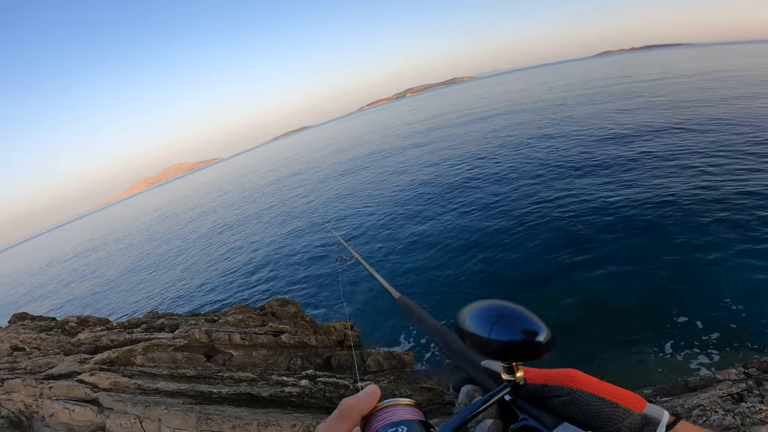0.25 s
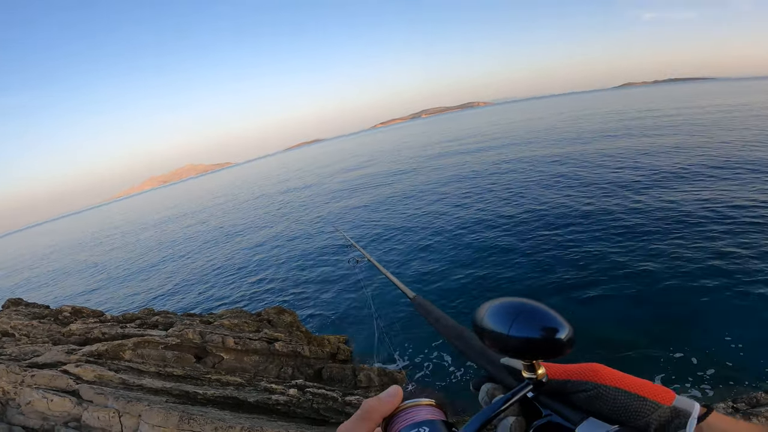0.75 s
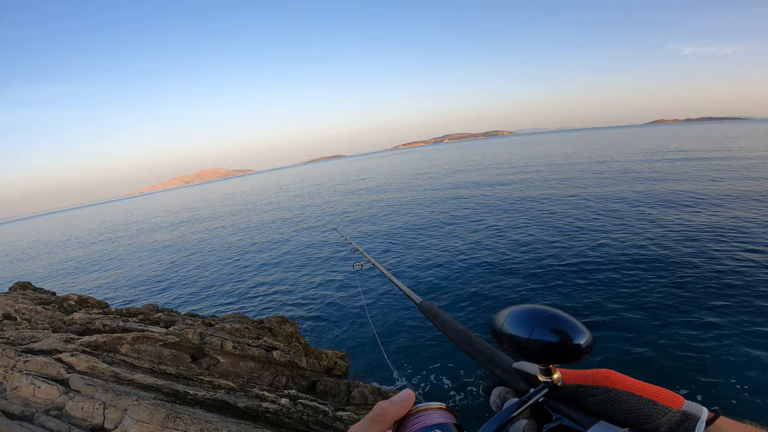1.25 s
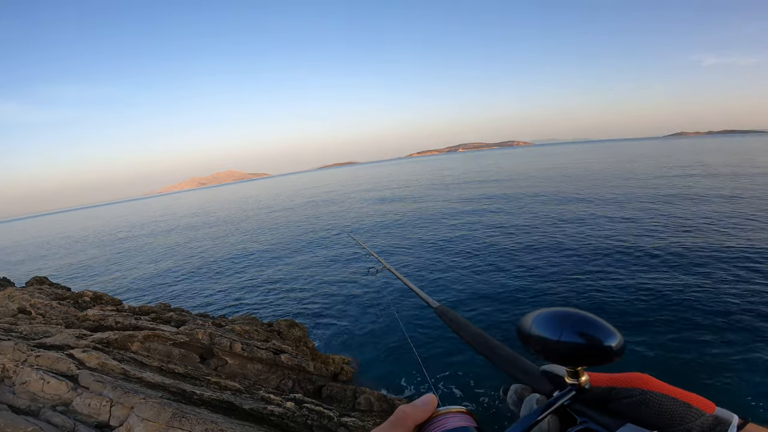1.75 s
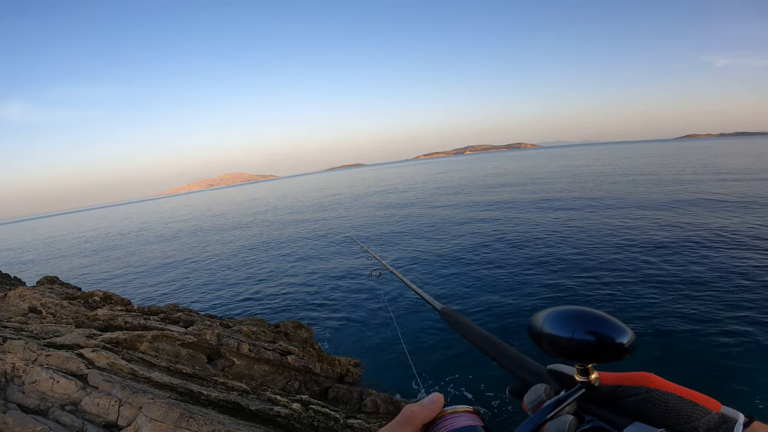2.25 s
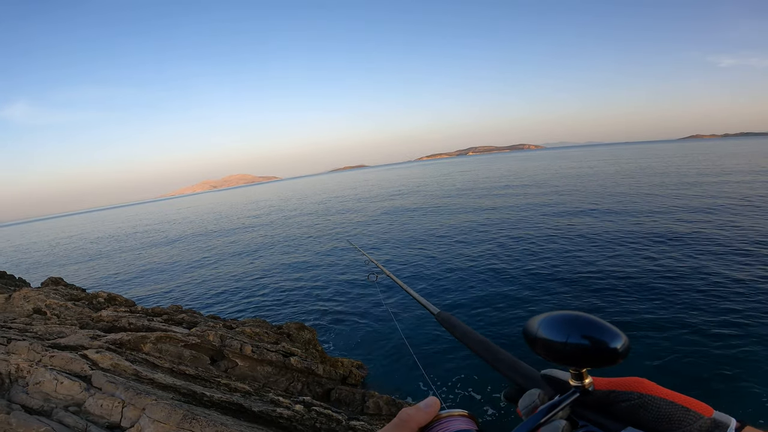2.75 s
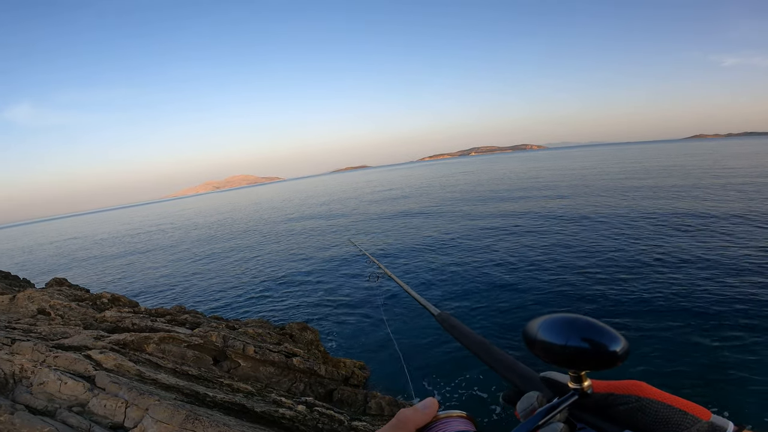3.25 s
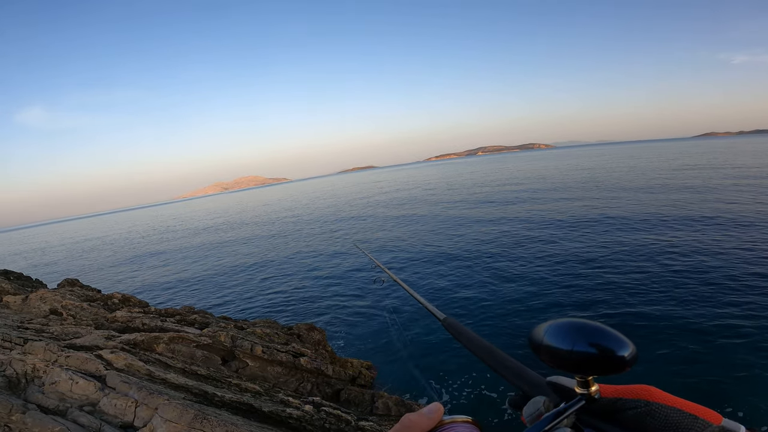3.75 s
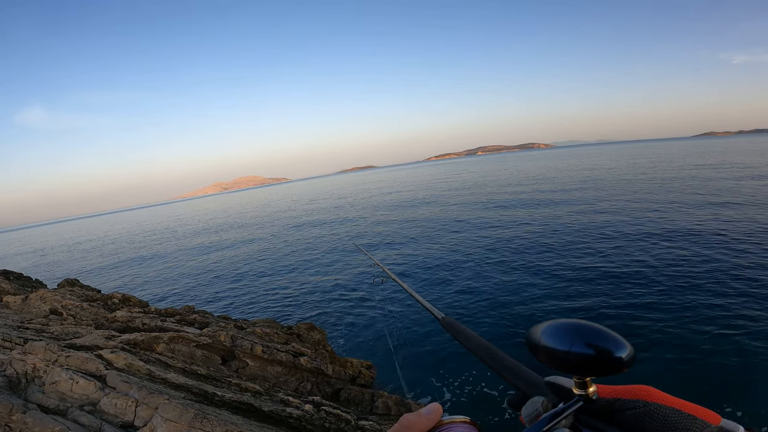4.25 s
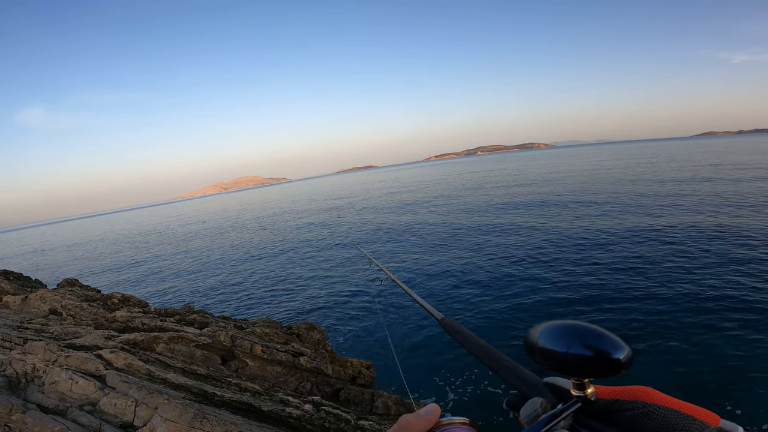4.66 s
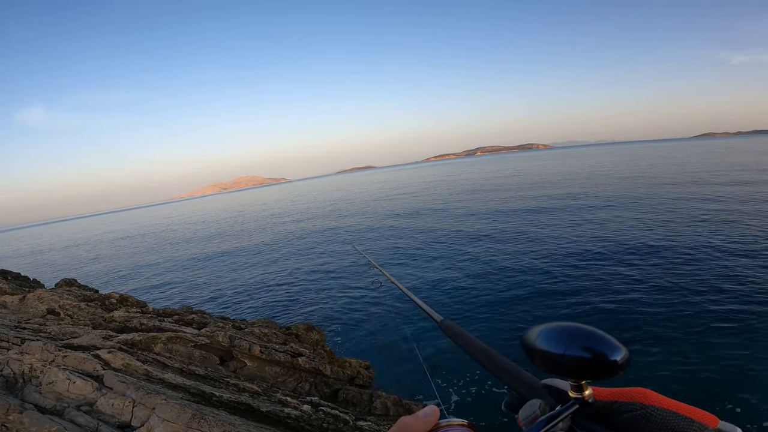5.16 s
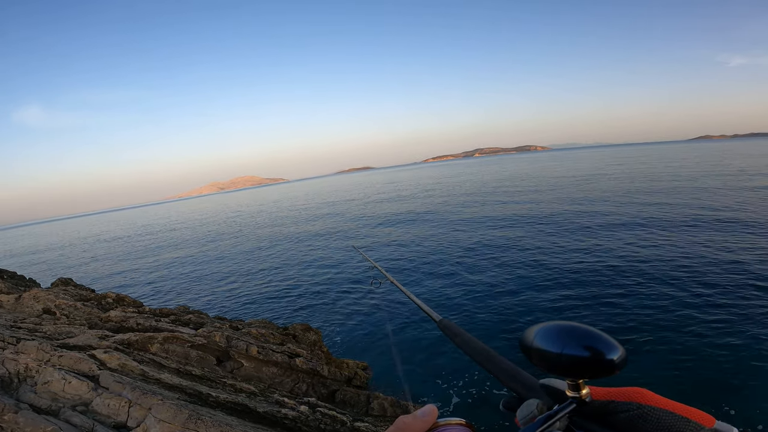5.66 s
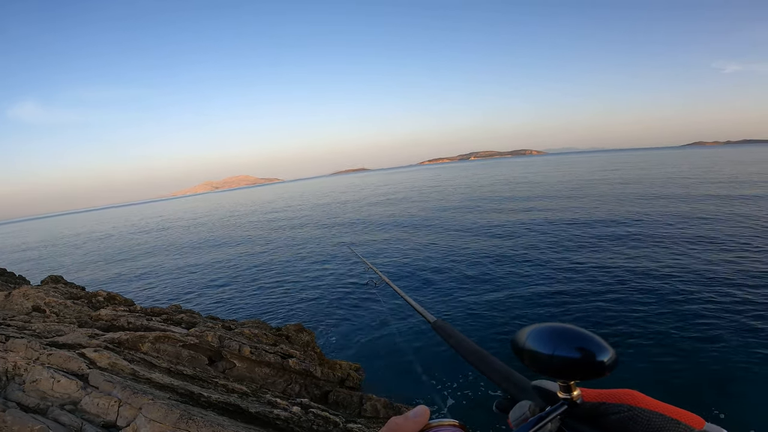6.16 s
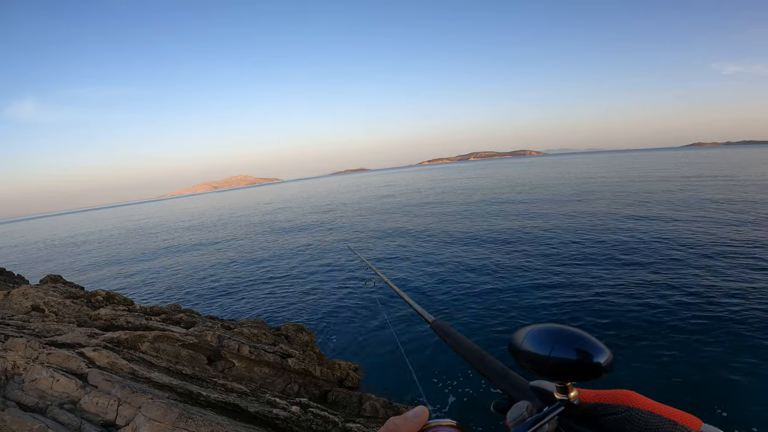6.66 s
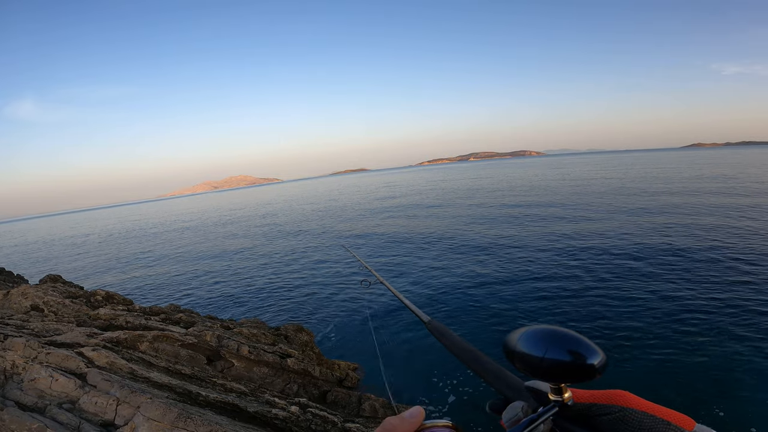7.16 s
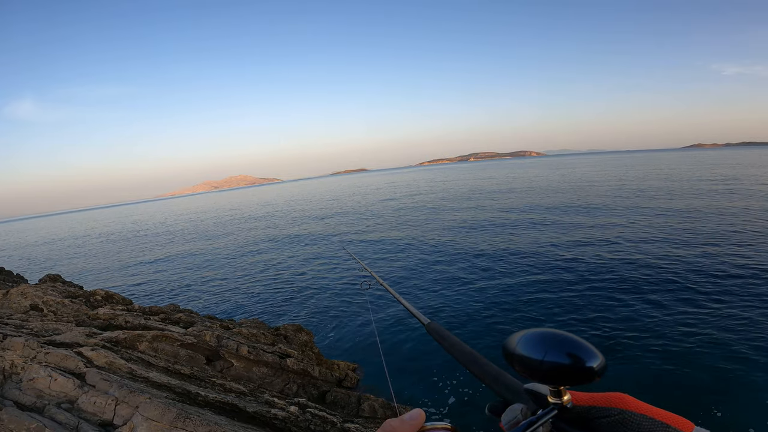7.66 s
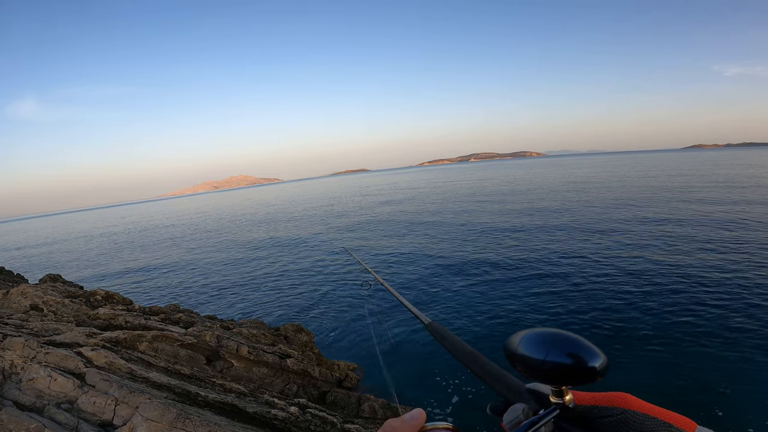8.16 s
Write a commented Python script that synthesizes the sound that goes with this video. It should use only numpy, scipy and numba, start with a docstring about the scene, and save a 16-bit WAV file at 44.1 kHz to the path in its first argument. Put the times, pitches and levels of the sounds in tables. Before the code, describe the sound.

Close seawater slaps, glugs and fizzes on rock above a steady deep engine hum that slowly swells; loose gear clatters right at the end.

```python
"""Small waves lap and gurgle among shore rocks from the start, over a far ship's drone and a low rumble.
Trapped air rings as pitched bubbles and spray ticks on stone; thin foam hisses near 1 s and from 3 to 4 s.
A hollow in the rock fills with a glug at 5.6 s, and the drone, made of sine waves, swells until 7.5 s.
Just after 8 s loose fishing tackle rattles briefly: ringing knocks with bright scrapes of noise."""
import sys
import numpy as np
from scipy import signal
from scipy.fft import rfft, irfft
from scipy.io import wavfile
from scipy.ndimage import uniform_filter1d
from numba import njit

SR = 44100
rng = np.random.default_rng(int(sys.argv[2]) if len(sys.argv) > 2 else 0)


def pcm_store(signal):
    """Save signal as 16-bit PCM."""
    levels = np.round(np.clip(np.atleast_2d(signal), -1, 1) * 32767)
    wavfile.write(sys.argv[1], SR, levels.astype(np.int16).T)


N = 371322

# The waves. Each row: crest in seconds, seconds to rise the last 10 dB, seconds to fall the first 10 dB,
# then relative levels in dB of the gulps, lapping, fizz and spray.
WAVES = [(0.05, 1, 0.14, -54, -57, -61.5, -71), (.3, 0.5, 0.5, -54.5, -57.5, -68, -84),
         (.8, 0.5, 0.35, -50, -55, -58.5, -68.5), (1.12, 0.2, .2, -51, -59, -59, -69),
         (1.56, .1, .15, -58, -60, -61, -72), (1.34, .07, .1, -55, -56, -58.5, -69.5),
         (1.75, 0.96, .5, -54.5, -55.5, -62, -76), (2.33, 0.4, 0.25, -54, -54.5, -66, -83),
         (2.85, 0.4349, .15, -54, -56.5, -57.5, -73), (3.25, 0.4975, 0.52, -52, -50.5, -51, -67.5),
         (3.59, 0.03, 0.06, -52, -54, -51.5, -70), (3.96, 0, 0.08, -55.5, -53.5, -60, -74.5),
         (3.7, 0.4648, 1, -47.5, -49, -54, -70.5), (4.8, 0, 0.34, -55.5, -56.5, -66, -83),
         (5.05, 0.3, 0.05, -56.5, -55.5, -65.5, -78), (5.62, 0.4044, 0.3, -52.5, -51.5, -58.5, -76),
         (5.87, 0.2, 0.24, -55, -55, -61, -79), (6.07, 0.24, .06, -54.5, -54.5, -64, -76.5),
         (6.6, 0.5, 0.6, -56.5, -67, -67.5, -77), (6.87, 0.1, .15, -59.5, -60.5, -68, -80.5),
         (7.5, 0.19, 0.25, -58, -56, -61, -79), (7.86, 0.2, 0.2, -64, -58.5, -70.5, -75)]
# The water between waves: relative levels in dB of the gulps, lapping, fizz and spray.
CALM_DB = (-59, -62.5, -69.5, -80)
# Bubble pitches in Hz that stand for the gulps, lapping, fizz and spray.
WASH_HZ = (280, 850, 2100, 6500)
# Tone colour of the wash at the microphone. Each row: frequency in Hz, relative level in dB per Hz.
WATER_COLOUR = [(60, -40.5), (110, -17.5), (150, -11), (280, -11.5), (590, -15.5), (830, -18.5),
                (1120, -18.5), (1400, -23), (1950, -25.5), (2900, -33.5), (4200, -40), (6300, -42.5),
                (7600, -45), (8200, -52), (9300, -51), (10800, -55), (12000, -48), (13000, -62)]
# How wide the water sounds. Each row: frequency in Hz, level in dB of the left-right part against the middle.
SPREAD = [(60, -40), (150, -24), (400, -14), (1200, -12), (2200, -8.5), (4000, -7.5), (13000, -6.5)]
# Single bubbles. Each row: start in seconds, peak in dB, starting pitch in Hz, cycles to swell, cycles to die.
BUBBLES = [(0.052, -42, 473.0, 12, 39), (0.094, -46, 1475.0, 2.1, 24.0), (0.19, -45, 619, 3, 14),
           (0.27, -44, 611, 3, 14), (0.337, -45, 480, 4, 20), (0.449, -41, 482, 12, 10.0),
           (0.473, -43, 648, 4.6, 42.0), (0.552, -47.0, 1571.0, 6.1, 18.0), (0.763, -42, 690, 2, 14),
           (0.907, -37.5, 258.0, 3.4, 27.0), (0.914, -51, 2648.0, 10.3, 60.0),
           (1.033, -45, 1270.0, 13.3, 32.0), (1.036, -48, 1550.0, 8.9, 25.0), (1.05, -41, 400, 3, 12),
           (1.2, -40, 390, 4, 14), (1.263, -41.0, 1227.0, 4.8, 20.0), (1.289, -48.0, 1733.0, 6.8, 19.0),
           (1.29, -42, 450, 2, 10), (1.29, -41, 950, 2, 14), (1.306, -42, 322.0, 13.4, 45.0),
           (1.316, -44.0, 1550.0, 14.0, 25.0), (1.324, -44.0, 1065.0, 4.2, 8.0),
           (1.333, -47.0, 1571.0, 6.1, 18.0), (1.335, -40, 1184.0, 2.1, 13.0), (1.336, -42, 690, 2, 14),
           (1.355, -46, 1600, 4, 16), (1.367, -44.0, 1012.0, 7.5, 39.0), (1.373, -38.5, 1496.0, 5.8, 24.0),
           (1.4, -42, 500, 4, 16), (1.5, -43.0, 1001.0, 3.9, 11.0), (1.54, -47, 1450, 5, 20),
           (1.556, -45.0, 1152.0, 6.6, 19.0), (1.559, -51.0, 2465.0, 3.1, 27.0),
           (1.627, -48, 2150, 14.0, 35.0), (1.711, -38.0, 493, 3.5, 10.0),
           (1.756, -45.0, 1108.0, 4.3, 38.0), (1.825, -46, 1012.0, 5.8, 39.0),
           (1.963, -45, 818.0, 8.7, 21.0), (2.021, -46, 1152.0, 6.6, 19.0), (2.034, -45, 1275, 14.0, 14.0),
           (2.205, -52.0, 1873.0, 10.7, 21.0), (2.236, -43.0, 947.0, 4.8, 19.0),
           (2.236, -41, 1190, 8.8, 46.0), (2.305, -45, 1022.0, 9.1, 17.0), (2.313, -43.5, 624.0, 8.6, 33.0),
           (2.345, -43.0, 1076.0, 4.2, 23.0), (2.782, -50, 1948.0, 11.2, 50.0),
           (2.797, -43.0, 699.0, 5.0, 18.0), (2.841, -43, 1087.0, 14.0, 18.0),
           (2.843, -48.0, 2228.0, 8.7, 25.0), (2.861, -47, 2088.0, 8.1, 53.0),
           (2.994, -49, 2648.0, 14.0, 30.0), (3.002, -40.5, 258.0, 4.4, 53), (3.006, -37.0, 782, 5.6, 31.0),
           (3.064, -45.5, 1940, 14.0, 41.0), (3.131, -41, 1098.0, 11, 12.0), (3.132, -46, 1940, 14.0, 32.0),
           (3.247, -38.0, 640, 4.5, 13.0), (3.272, -45, 1582.0, 11.7, 33.0), (3.337, -39, 656.0, 3.3, 13.0),
           (3.356, -43, 1108.0, 8.8, 47.0), (3.357, -41, 247.0, 13.5, 12.0),
           (3.359, -35.5, 279.0, 3.7, 19.0), (3.403, -41, 1012.0, 5.8, 55.0),
           (3.425, -40.0, 1055.0, 2.1, 12.0), (3.431, -38.0, 258.0, 2.6, 8.0),
           (3.458, -38, 236.0, 3.7, 15.0), (3.477, -39.5, 613.0, 8.5, 41), (3.57, -36, 367, 8.0, 21.0),
           (3.571, -45.0, 2088.0, 12.0, 60.0), (3.574, -46, 2330, 14.0, 49.0),
           (3.585, -43.0, 1680, 14.0, 27.0), (3.602, -42.0, 1905.0, 14.0, 60.0),
           (3.634, -39.0, 1690.0, 9.7, 36.0), (3.636, -39, 571, 5.1, 49), (3.682, -40, 1119.0, 6.4, 12.0),
           (3.697, -42, 1851.0, 7.2, 21.0), (3.783, -40.5, 861.0, 10.6, 52.0),
           (3.808, -47, 1873.0, 10.7, 21.0), (3.818, -42, 1076.0, 14.0, 12.0),
           (3.921, -46, 2121.0, 12.1, 35.0), (3.921, -40, 1076.0, 4.2, 12.0),
           (3.928, -45, 1184.0, 9.7, 60.0), (3.943, -38, 538.0, 9.1, 19.0), (3.947, -39, 882.0, 14.0, 46.0),
           (3.972, -41.0, 1205.0, 2.1, 13.0), (3.98, -40, 567, 7.9, 20.0), (3.982, -41.0, 1001.0, 7.4, 8.0),
           (3.988, -42.0, 890, 14.0, 13.0), (4.089, -40, 538.0, 10.7, 14.0), (4.194, -44, 936.0, 8.4, 60.0),
           (4.346, -44.5, 890, 14.0, 13.0), (4.4, -51, 1690.0, 12.4, 19.0),
           (4.404, -49.0, 2034.0, 7.9, 8.0), (4.615, -35.5, 790, 4.0, 28.0), (4.662, -43, 839.0, 4.9, 13),
           (4.663, -44, 418, 3.4, 60.0), (4.747, -46.0, 910, 4.6, 23.0), (4.801, -44.5, 936.0, 14.0, 45),
           (4.802, -52, 2160, 8.4, 24.0), (4.866, -40.5, 194, 7.5, 23), (4.879, -44, 1050, 2, 11),
           (4.955, -46.0, 930, 14.0, 41.0), (4.994, -41, 990.0, 5.0, 14.0),
           (4.996, -48, 1248.0, 14.0, 26.0), (4.997, -43.0, 624.0, 3.2, 33.0),
           (5.053, -46.5, 1286, 9.4, 54.0), (5.077, -43.5, 1087.0, 6.2, 12.0),
           (5.187, -46.5, 930, 14.0, 60.0), (5.325, -47, 732.0, 5.2, 50), (5.421, -42, 496, 5.3, 30),
           (5.464, -46, 1001.0, 14.0, 26.0), (5.498, -40.5, 710.0, 6.4, 10.0), (5.525, -49, 1600, 5, 20),
           (5.545, -41, 581.0, 7.1, 15.0), (5.583, -44, 720, 3, 14), (5.59, -39, 495.0, 2.1, 13.0),
           (5.595, -49.0, 1765.0, 10.1, 29.0), (5.652, -42, 527.0, 5.6, 11.0),
           (5.66, -37, 1108.0, 4.3, 12.0), (5.683, -37.5, 236.5, 5.6, 56.0),
           (5.686, -40.5, 419.0, 6.4, 60.0), (5.696, -41.0, 592.0, 3.0, 15.0),
           (5.718, -38.5, 590, 3.9, 21.0), (5.756, -42, 549.0, 6.3, 11.0), (5.768, -43, 1590, 14.0, 41.0),
           (5.78, -37.5, 1076.0, 6.2, 37.0), (5.789, -45.0, 1830.0, 7.1, 20.0),
           (5.833, -39.5, 1200, 4.7, 28), (5.841, -38, 968.0, 6.9, 25.0), (5.85, -41.0, 753.0, 6.8, 19.0),
           (5.858, -41, 968.0, 11.9, 25.0), (5.885, -44, 1100, 3, 14), (5.904, -38.0, 1098.0, 6.3, 12.0),
           (5.92, -49, 1500, 4, 18), (5.94, -45, 1000, 4, 20), (5.975, -45.0, 990.0, 14.0, 8.0),
           (6.039, -46, 979.0, 7.0, 25.0), (6.05, -45, 620, 3, 14), (6.171, -46, 560, 2, 14),
           (6.81, -48.0, 1087.0, 2.1, 32.0), (6.833, -54.0, 1959.0, 11.2, 32.0),
           (6.836, -51.0, 1614.0, 9.2, 18.0), (6.91, -47.5, 958.0, 14.0, 20.0),
           (6.941, -54.0, 1884.0, 13.9, 40.0), (7.06, -47, 861.0, 6.2, 12.0),
           (7.09, -49.0, 915.0, 8.2, 28.0), (7.272, -47.5, 730, 6.6, 48.0), (7.368, -41.5, 950, 13.3, 42.0),
           (7.398, -43.5, 409.0, 7.6, 52.0), (7.402, -44, 290.0, 14.0, 18.0),
           (7.406, -44, 258.0, 2.9, 52.0), (7.455, -45.5, 880, 9.3, 18.0), (7.46, -47, 1130, 3, 14),
           (7.462, -40.5, 331, 9.9, 25.0), (7.463, -43.0, 516.0, 2.1, 11.0), (7.479, -44, 493, 14.0, 10.0),
           (7.484, -42, 549.0, 3.9, 11.0), (7.5, -51.0, 2196.0, 14.0, 36.0),
           (7.525, -49, 2002.0, 7.8, 33.0), (7.542, -43.5, 667.0, 4.8, 29), (7.543, -35.5, 1114, 4.3, 19),
           (7.553, -45, 1431.0, 5.6, 43.0), (7.57, -48, 1750, 5, 20), (7.596, -44, 462.0, 4.2, 9.0),
           (7.61, -47, 640, 3, 14), (7.629, -43.5, 1030, 7.6, 29), (7.84, -46.0, 484.0, 3.5, 20),
           (7.84, -47, 680, 5.4, 24.0), (7.86, -47, 1000, 3, 20), (7.925, -48, 1150, 4, 18)]
# A hollow in the rock fills. One row: start in seconds, peak in dB, starting pitch in Hz,
# cycles to swell, cycles to die, rise in pitch per cycle as a fraction.
GLUG = (5.598, -30, 253, 1.7, 27, .055)
# Drops on stone. Each row: start in seconds, peak in dB before panning, pitch in Hz.
DROPS = [(.1251, -59.5, 3560), (.428, -60, 3100), (.554, -46, 3250), (.585, -53, 2990),
         (0.637, -47.5, 4050), (1.3249, -56, 3420), (1.4123, -48, 4830), (1.531, -49.5, 3530),
         (1.558, -52, 2500), (1.632, -56, 5470), (1.6811, -52, 3080), (1.952, -53.5, 3200),
         (2.353, -57, 5380), (2.373, -55, 3080), (2.7407, -50, 3480), (2.88, -43, 3000), (2.979, -48, 2850),
         (3.409, -50, 5600), (3.497, -52, 6500), (3.577, -46, 2520), (4.303, -54, 6200), (4.481, -56, 3570),
         (4.642, -56, 3230), (4.661, -56, 4570), (4.7028, -54, 3380), (4.7576, -56.5, 3550),
         (5.1546, -55.5, 3360), (5.49, -52, 3480), (5.51, -51, 4530), (5.66, -56, 3480),
         (5.7081, -48.5, 4340), (6.087, -54.5, 3496), (6.4735, -54, 3550), (6.753, -56, 3400),
         (6.931, -59, 3440), (6.956, -58, 3490), (7.4652, -51.5, 3650), (7.505, -56, 2500),
         (7.845, -58, 4500), (7.85, -55, 2500), (7.906, -59, 3520), (7.947, -61, 7500), (7.962, -60, 6000),
         (7.987, -56, 6300), (7.995, -57, 6300), (8.026, -52, 2500), (8.288, -55, 3400)]
# Hiss of foam. Each row: crest in seconds, seconds to rise 10 dB, seconds to fall 10 dB,
# centre in Hz, width in Hz, level at the crest in dB.
FOAM = [(0.85, .25, .2, 5000, 900, -68), (1.1, 0.4, .35, 4100, 1500, -61), (3.0, .3, .3, 6300, 2000, -68),
        (3.85, .4, .4, 4000, 1800, -65)]
# Knocks of the tackle. Each row: start in seconds, peak of the dull knock in dB,
# peak of the bright scrape against it in dB, pitch of the blow in Hz.
RATTLE = [(8.092, -41.5, -22, 1750), (8.103, -42, -21, 1700), (8.111, -47, -15, 1900),
          (8.115, -33.5, -15.5, 1310), (8.119, -36, -15, 1100), (8.122, -39, -15, 1900),
          (8.127, -52.5, 0.5, 2300), (8.139, -48, -20, 2500), (8.175, -63.5, -4.5, 1700),
          (8.188, -49, -24, 1050), (8.236, -37, -30, 1000), (8.248, -40.5, -23.5, 1150),
          (8.262, -42.5, -22, 1000), (8.27, -46, -21.5, 950), (8.281, -48.5, -8.5, 1400),
          (8.29, -50, -11, 1400)]
# Ways the tackle can ring. Each row: pitch in Hz before a small random detuning, cycles to die.
TACKLE_MODES = [(580, 13), (800, 11), (950, 21), (1150, 14), (1450, 22), (1750, 23), (2050, 22), (2350, 28),
                (3600, 30)]
# The drone swells as the ship draws nearer. Each row: time in seconds, level of the strongest order in dB.
SHIP_LEVEL = [(0, -34), (.6, -35), (2.3, -31), (4, -30), (4.6, -29.5), (7.5, -27), (8.42, -28)]
# Speed of the ship's shaft. Each row: time in seconds, turns per second.
SHAFT_HZ = [(0, 13.68), (.75, 13.68), (3.5, 13.714), (8.42, 13.722)]
# Tones of the shaft. Each row: multiple of the shaft speed, level against the strongest in dB.
SHAFT_ORDERS = [(6, 0), (7, -32), (6.5, -30), (8, -33)]
# Low hums, some near multiples of the shaft speed: steady pitches in Hz,
# and the level in dB around which each one wanders.
HUM_HZ = (37.77, 39.34, 41.12, 44.24, 54.85, 59.38)
HUM_DB = [-59.5, -58, -58, -61.5, -54.5, -53.5]
# Tone colour of the distant swell, before its bass filter. Each row: frequency in Hz, relative dB per Hz.
RUMBLE_COLOUR = [(15, -7), (25, -6), (45, -4), (70, -3), (100, -8), (140, -9), (300, -49)]
# Timing between the two microphone ports. Each row: frequency in Hz, radians by which the left leads.
PORT_LEAD = [(300, 0), (1550, -.3), (2240, -.8), (2840, -.9), (4650, -.2), (7060, -.2), (11900, .1)]

WATER_DB, RUMBLE_DB = -47.5, -49.5  # overall loudness
HISS_DB = -13  # steady hiss of the microphone, against the wash before its colour
CREST_ROUND = 1.7  # 1 gives a pointed crest, 2 a bell
DENSE = 0.2  # how far a stronger wash blurs its bubbles together
RISE_AT_1K, RISE_SLOPE = 0.003, 0.4  # rise in pitch per cycle at 1 kHz; big bubbles rise faster
DROP_PAN_DB = 3  # typical left-right difference
TOP_HZ = 13000  # treble cut

T = np.arange(N) / SR  # seconds
HZ = np.maximum(np.arange(N // 2 + 1) * SR / N, 1)
EARS = np.array([[1], [-1]])  # signs that add to the left and take from the right


def undb(db):
    """Turn decibels into a plain multiplier."""
    return 10 ** (np.asarray(db) / 20)


def rms(x):
    """Average strength of a sound."""
    return np.sqrt(np.mean(x ** 2))


def at(table, hz):
    """Read a value between (Hz, value) points, with pitch on a log scale."""
    points_hz, values = np.array(table).T
    return np.interp(np.log(hz), np.log(np.maximum(points_hz, 1)), values)


def filt(x, gain):
    """Multiply each frequency of a sound by its gain."""
    return irfft(rfft(x) * gain, N)


def peak(hz, width):
    """Response of one resonance, with gain 1 at its centre."""
    return 1 / (1 + 1j * (HZ ** 2 - hz ** 2) / (HZ * width))


def walk(rate):
    """Random levels held for 1 / rate seconds and smoothed twice; their spread is near 1."""
    hold = int(SR / rate)
    steps = np.repeat(rng.standard_normal(N // hold + 1), hold)
    return 1.51 * uniform_filter1d(uniform_filter1d(steps, hold), hold)[:N]


@njit
def ring(n, start, hz, size, grow, cycles, rise, lean):
    """Each sine swells for grow cycles, then dies as its pitch changes; lean shifts its phase between ports."""
    out = np.zeros((2, n))
    for k in range(len(hz)):
        step = 2 * np.pi * hz[k] / SR
        phase = 0.
        i = start[k]
        while phase < 2 * np.pi * (grow[k] + cycles[k]) and i < n and step < 2.8:
            turn = phase / (2 * np.pi)
            level = size[k] * min(turn / grow[k], np.exp(-5 * (turn - grow[k]) / cycles[k]))
            out[0, i] += level * np.sin(phase + lean[k])
            out[1, i] += level * np.sin(phase - lean[k])
            phase += step * (1 + rise[k] * turn)
            i += 1
    return out


def burst(s, length):
    """A puff of noise with a sharp front that dies 60 dB in about five lengths."""
    t = np.arange(int(6 * length * SR) + 2) / SR
    out = np.zeros(N + len(t))
    first = int(s * SR)
    out[first:first + len(t)] = rng.standard_normal(len(t)) * np.exp(-1.4 * t / length)
    return out[:N]


def crest(t, s, rise, fall):
    """Level in dB of a wave that rises to its crest and drains away."""
    return -10 * np.where(t < s, (s - t) / rise, (t - s) / fall) ** CREST_ROUND


def surge(hz):
    """Rise and fall of the wash over time, around its mean, for bubbles of one pitch."""
    t = np.arange(0, N / SR, .01)

    def of_size(levels_db):
        return np.interp(np.log(hz), np.log(WASH_HZ), levels_db)

    power = undb(2 * of_size(CALM_DB))  # doubled dB give power
    for s, rise, fall, *levels_db in WAVES:
        power = power + undb(2 * (of_size(levels_db) + crest(t, s, rise, fall)))
    return np.interp(T, t, np.sqrt(power / power.mean()))


def bubble_family(hz, count):
    """Near bubbles around one pitch ring over a noise blur of further ones."""
    n = int(count * np.sqrt(hz / 1000))  # small bubbles are the more numerous
    when, detune, life, nearness = rng.random((n, 4)).T
    g = rng.standard_normal(n)
    lean = undb(at(SPREAD, hz))
    start = (when * N).astype(int)
    pitch = hz * 2 ** (0.7078 * detune - .35)
    size = undb(9.5 * nearness ** 3)  # many faint, few near
    cycles = (12 + 24 * life) * (hz / 1000) ** 0.49
    near = ring(N, start, pitch, size, 3.06 + 0 * g, cycles, .005 * g ** 2, lean * g)
    mid, side = filt(rng.standard_normal((2, N)), peak(hz, hz / 2.43) ** 2)
    blur = (mid + lean * side * EARS) / rms(mid)
    # part of the power in single bubbles; the rest is blur
    share = np.clip((.45 - 0.071 * np.abs(np.log2(hz / 900))) * surge(hz) ** -DENSE, 0, 1)
    return np.sqrt(share) * near / rms(near) + np.sqrt(1 - share) * blur


def spray(ticks):
    """Lone broadband clicks, smeared over a few milliseconds, tick in the treble."""
    hits = np.zeros(N)
    hits[rng.integers(0, N, ticks)] = undb(11. * rng.random(ticks) ** 3)
    smear = signal.lfilter([1], [1, -np.exp(-1 / (0.002 * SR))], uniform_filter1d(hits, size=60))
    mid, side = filt(rng.standard_normal((2, N)) * smear, peak(5000, 6700))
    return surge(5100) ** .85 * (mid + 0.35 * side * EARS) / rms(mid)


def wash(count=800, ticks=700):
    """Half-octave bubble families follow the waves; spray and microphone hiss join, all in one tone colour."""
    out = 0
    slop = walk(11)  # shared by all pitches
    for hz in 156 * 2 ** np.arange(0, 6.5, .5):
        flicker = walk(15)  # each family's own
        family = bubble_family(hz, count)
        out = out + np.sqrt(hz) * family * surge(hz) * undb(0.81 * slop + 1.6 * flicker)
    out = out / rms(out) + undb(-9) * spray(ticks)
    mid, side = rng.standard_normal((2, N))
    out = out + undb(HISS_DB) * (mid + .4 * side * EARS)
    out = filt(out, undb(at(WATER_COLOUR, HZ)))
    return out / rms(out) * undb(WATER_DB)


def bubbles():
    """Single pockets of air stand out of the wash, each ringing with a rising pitch."""
    rows = [(*b, RISE_AT_1K * (1000 / b[2]) ** RISE_SLOPE) for b in BUBBLES] + [GLUG]
    s, db, hz, grow, cycles, rise = np.transpose(rows)
    lean = undb(at(SPREAD, hz)) * rng.standard_normal(len(s))
    start = (s * SR).astype(int)
    return ring(N, start, hz, undb(db), np.maximum(grow, 1), np.maximum(cycles, 2), rise, lean)


def drops():
    """Each drop is a short splat of noise around its own pitch, somewhere left or right."""
    out = 0
    for s, db, hz in DROPS:
        splat = filt(burst(s, 0.011), peak(hz, 0.29 * hz) ** 2 + 0.046 * peak(9000, 8000))
        pan_db = EARS * DROP_PAN_DB * rng.standard_normal() / 2
        out = out + splat / np.abs(splat).max() * undb(db + pan_db)
    return out


def foam():
    """Fine foam left by the big waves bursts in a smooth, narrow hiss."""
    out = 0
    for s, rise, fall, hz, width_hz, db in FOAM:
        mid, side = filt(rng.standard_normal((2, N)), peak(hz, width_hz) ** 2)
        hiss = (mid + 0.25 * side * EARS) / rms(mid)
        out = out + hiss * undb(db + crest(T, s, rise, fall))
    return out


def tackle():
    """Loose parts knock: each blow rings the modes near its own pitch and scrapes brightly."""
    out = 0
    hz, cycles = np.transpose(TACKLE_MODES)
    same = 0 * hz  # one entry per mode
    for s, db, treble_db, blow_hz in RATTLE:
        size = 1 / (1 + (np.log2(hz / blow_hz) / 0.5) ** 4)
        start = (s * SR + 40 * rng.random(len(hz))).astype(int)
        pitch = hz * (1 + 0.03 * rng.standard_normal(len(hz)))
        dull = ring(N, start, pitch, size, 1.3 + same, cycles, same, 0.25 + same)
        bright = filt(burst(s, 0.007), peak(6110, 3500) ** 4 + .2 * peak(10500, 4000) ** 4)
        knock = dull / np.abs(dull).max()
        scrape = undb(treble_db) * bright / np.abs(bright).max()
        out = out + undb(db) * (knock + scrape)
    return out


def ship():
    """A slow shaft's multiples drone; steady low hums beat together, some near multiples of its speed."""
    turns = np.cumsum(np.interp(T, *np.transpose(SHAFT_HZ))) / SR
    drone = 0
    for multiple, db in SHAFT_ORDERS:
        drone = drone + undb(db) * np.sin(2 * np.pi * (multiple * turns + rng.random()))
    hums = 0
    for hz, db in zip(HUM_HZ, HUM_DB):
        hums = hums + undb(db + 0.64 * walk(2)) * np.sin(2 * np.pi * (hz * T + rng.random()))
    level_db = np.interp(T, *np.transpose(SHIP_LEVEL)) + 0.13 * walk(5)
    return np.sqrt(2) * (drone * undb(level_db) + hums)  # a sine of peak sqrt(2) has rms 1


def swell():
    """Far breakers merge into a low rumble of noise that heaves, nearly alike at both ports."""
    heave = undb(2 * walk(5))
    bass_only = 1 / (1 + (HZ / 300) ** 4)
    mid, side = filt(rng.standard_normal((2, N)) * heave, undb(at(RUMBLE_COLOUR, HZ)) * bass_only)
    narrow_side = filt(side, peak(30, 18) ** 2)
    return (mid + undb(-13) * narrow_side * EARS) / rms(mid) * undb(RUMBLE_DB)


def scene():
    """Add the water, the tackle, the ship and the distant swell."""
    return wash() + bubbles() + drops() + foam() + tackle() + ship() + swell()


def record(dry):
    """Sound reaches the left port a little late over most pitches; the top is cut."""
    wet = filt(dry, np.exp(.5j * EARS * at(PORT_LEAD, HZ)))  # half the shift on each port
    return signal.sosfilt(signal.ellip(8, .2, 70, TOP_HZ, fs=SR, output="sos"), wet)


dry = scene()
out = record(dry)
pcm_store(out)
```